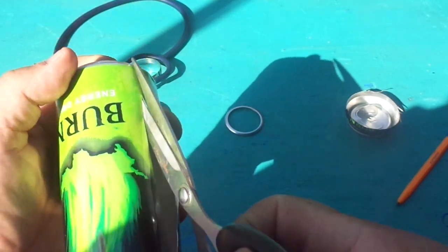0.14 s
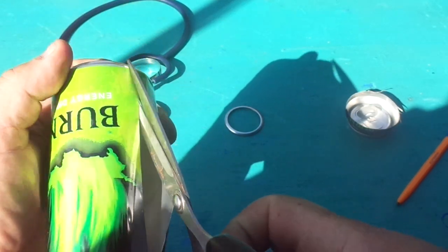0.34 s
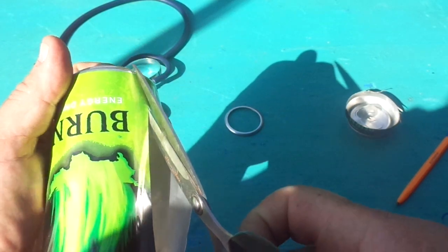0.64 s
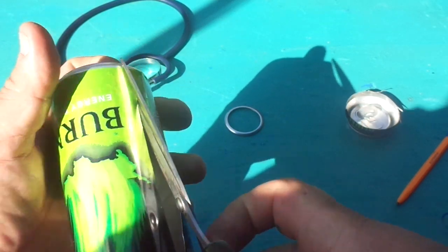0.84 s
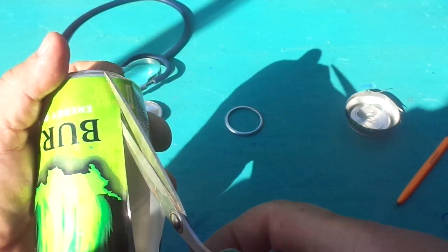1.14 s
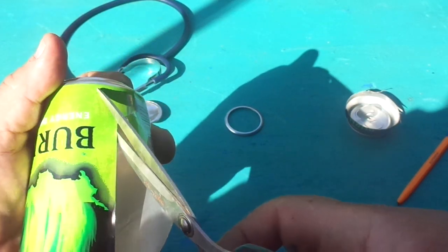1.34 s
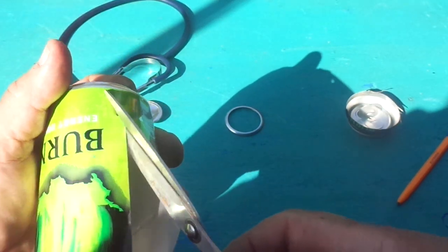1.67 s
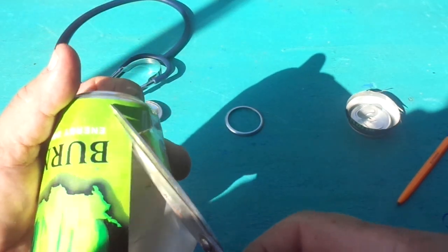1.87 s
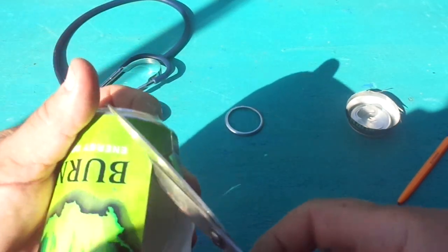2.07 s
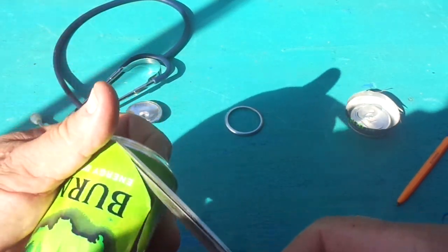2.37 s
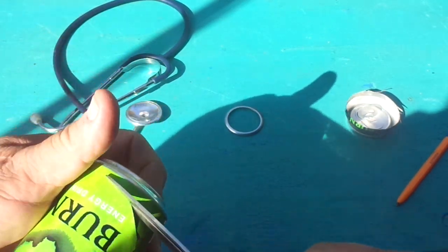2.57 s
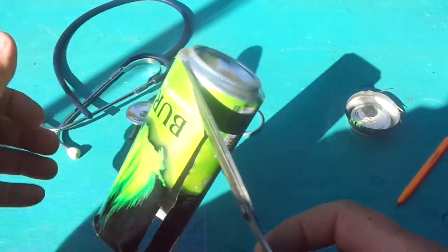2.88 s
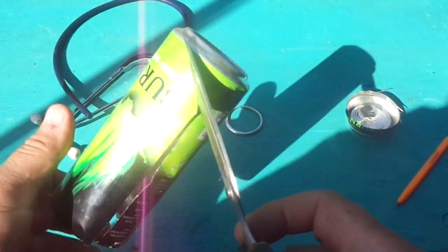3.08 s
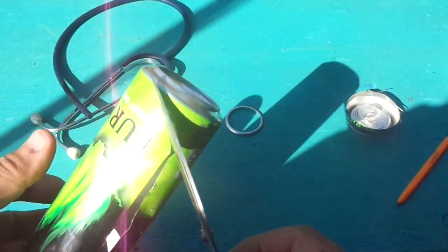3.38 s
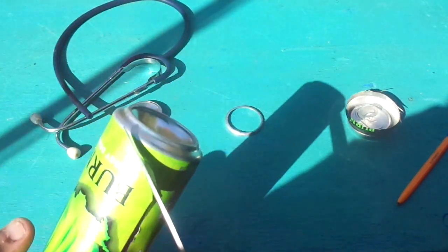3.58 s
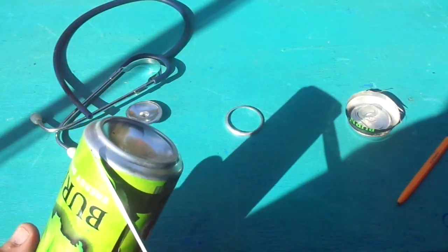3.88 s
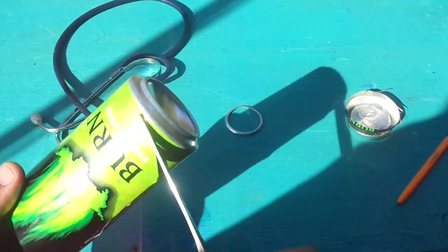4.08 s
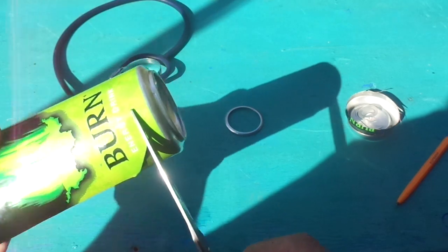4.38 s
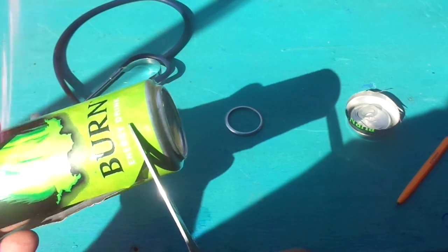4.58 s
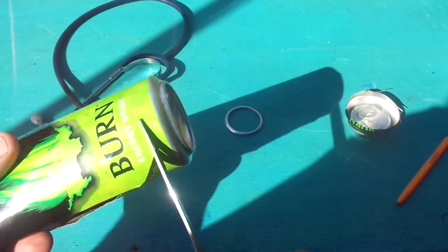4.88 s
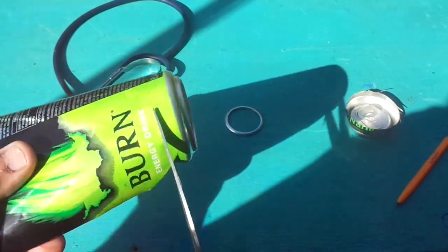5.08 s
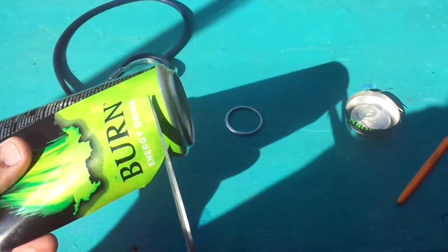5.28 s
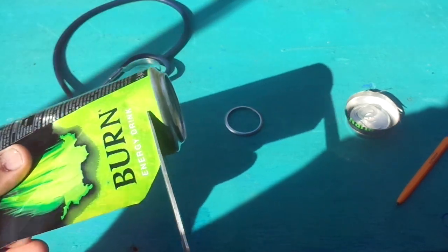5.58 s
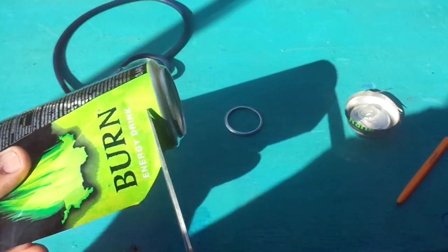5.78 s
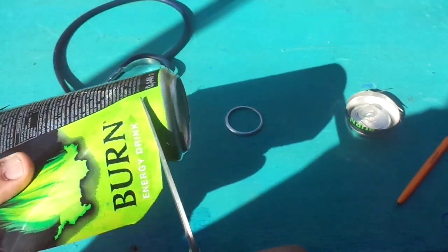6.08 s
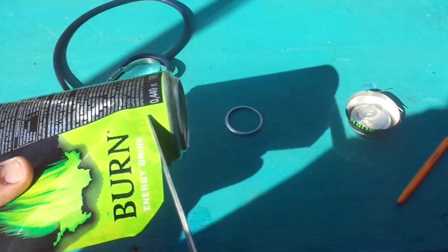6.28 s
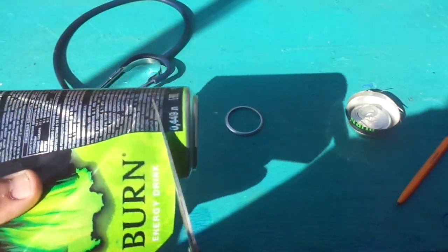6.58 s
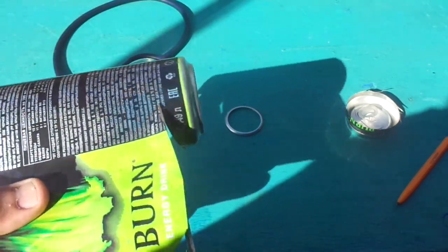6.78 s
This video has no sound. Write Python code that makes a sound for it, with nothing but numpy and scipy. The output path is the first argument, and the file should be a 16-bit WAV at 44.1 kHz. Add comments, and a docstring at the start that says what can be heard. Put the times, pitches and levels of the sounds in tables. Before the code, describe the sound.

Scissors cut through a thin aluminium drink can close up, with irregular crisp snaps, crackling shears and short hollow metallic rings in a small room.

```python
"""Scissors cut the wall of an aluminium drink can, close to the microphone in a small room.
The blades shear the sheet in runs of tiny fractures; sharp snaps are avalanches of them. Each jolt rings
the hollow can, higher late on as its top comes loose, and the cut sheet wobbles in low bending modes.
Behind: narrow bands of noise sound faintly late on, skin rubs, hands and can bump dully on the table, a low
thump lies under one hard snap, and the room adds reflections, air and hum. A limiter catches the peaks."""
import sys
import numpy as np
from scipy import signal
from scipy.fft import rfft, irfft
from scipy.io import wavfile
from scipy.ndimage import uniform_filter1d, minimum_filter1d

SR = 44100
rng = np.random.default_rng(int(sys.argv[2]) if len(sys.argv) > 2 else 0)


def wav_record(signal):
    """Record a signal, one row per channel, as 16-bit PCM in the file named by sys.argv[1]."""
    frames = np.transpose(np.atleast_2d(signal))
    bounded = np.clip(frames, -1, 1)
    # unit amplitude maps onto the largest positive 16-bit level
    quanta = np.round(bounded * 32767).astype(np.int16)
    wavfile.write(sys.argv[1], SR, quanta)


N = 305613

# Levels in the tables are relative, ahead of any trim in the functions, unless marked rms.
# quiet air of the room, spectrum: (f/Hz, level/dB)
AIR_SPECTRUM = [(25, 1), (110, 1), (250, -0.5), (500, 2), (850, 6.5), (1400, 2.5), (2200, 0.5), (4000, -8),
                (15000, -14)]
AIR_RMS_DB = -51
HUM_HZ, HUM_RMS_DB = 81, -69.5
# reverberation of the room: (f/Hz, t60/s)
ROOM_DECAY = [(200, 0.24), (800, 0.11), (2000, 0.12), (5500, 0.11), (14000, 0.12)]
# spectrum of the faint stereo side signal: (f/Hz, level/dB)
SIDE_SPECTRUM = [(300, -22), (800, -31), (3000, -23), (6000, -19), (14000, -12)]
BAND_LIMIT_HZ = 15300
# faint narrow-band noise near 1.5 and 2.1 kHz, course: (t/s, level/dB)
FAINT_LEVEL = [(5.9, -54), (6.05, -50), (6.25, -48), (6.42, -54)]
# bands of that noise: (f/Hz, width/Hz, level/dB)
FAINT_BANDS = [(1530, 40, 1.5), (2070, 170, -4)]
# fingers shifting on the can: (t/s, level/dB)
HANDLING_LEVEL = [(0, -53), (1.1, -68), (1.3, -56), (1.8, -74), (1.9, -52), (2.35, -51), (2.9, -54),
                  (3.07, -66), (3.35, -45.5), (3.8, -82), (3.95, -74), (4.3, -53), (4.8, -77), (5.3, -61),
                  (6.93, -62.5)]
# dull bumps of handling; the last row is the low thump under the hard snap at 5.87 s: (t/s, level/dB, f/Hz)
BUMP_EVENTS = [(1.151, -44, 101), (1.512, -36, 129), (1.67, -34, 130), (1.705, -41, 110), (1.763, -38, 100),
               (1.815, -35.5, 146), (2.021, -38, 75), (2.058, -42, 165), (2.166, -40, 80),
               (2.203, -36, 118), (2.334, -35.5, 141), (2.365, -34, 121), (2.382, -39, 151),
               (2.406, -33, 117), (3.161, -49, 96.7), (3.339, -52, 93.7), (3.626, -37, 100.6),
               (3.674, -37.5, 198), (3.702, -34.5, 220), (3.724, -23.5, 207), (3.763, -35, 111),
               (3.802, -40, 90), (3.874, -50, 115), (4.237, -41.5, 252), (5.869, -26.5, 56)]
# how freely the cut sheet can flap: (t/s, level/dB)
SHEET_LOOSENESS = [(0, -7), (1.2, -13), (4.3, -12), (5.1, -4.5), (5.8, 1.5), (6.93, -5.5)]
# slow bending modes of the cut sheet: (f/Hz, width/Hz, level/dB)
BENDING_MODES = [(262, 90, -9), (373, 208, 4), (469, 99, 3)]
# ring pitch of the can, moved by the grip and the loosening top, before detuning: (t/s, f/Hz)
RING_PITCH = [(0, 805), (1.05, 790), (1.24, 850), (1.34, 795), (1.75, 855), (2.05, 926), (2.6, 929),
              (2.8, 840), (3.12, 860), (3.2, 700), (3.28, 907), (4.3, 846.6), (5.45, 921), (5.65, 1100),
              (6.2, 1130), (6.9, 1295)]
# modes of the hollow can: (multiple of the ring pitch, level/dB, t60/s at 850 Hz ring pitch)
HOLLOW_MODES = [(.87, -5.5, 0.17), (1.0, 16, 0.033), (1.13, -9.5, 0.13), (1.42, 3.5, 0.016),
                (.95, -1.5, 0.059)]
# spectrum of a fracture in the sheet, before tilt and patches: (f/Hz, level/dB)
FRACTURE_SPECTRUM = [(30, -25.5), (150, -27), (350, -18), (550, -15), (800, -0.5), (1100, -5.5),
                     (1750, 2.5), (2300, -2), (3400, -0.5), (4800, -6), (7000, -5.5), (10000, -9.5),
                     (15000, -22)]
# modes of the thin wall and the blades, before detuning: (f/Hz, level over the crack/dB, t60/s)
WALL_MODES = [(1398, 1.5, 0.024), (2010, -4, 0.051), (2603, 1, 0.06), (2910, -0.5, 0.053), (3070, -6, 0.04),
              (3620, -1, 0.094), (4185, -1.5, 0.039), (5620, -3.5, 0.011), (6650, -2, 0.032)]
# strokes of the blades, shearing or scraping:
# (start t/s, end t/s, level/dB, swell from start to end/dB, brightness/dB per octave)
STROKES = [(0.074, 0.146, -31.5, 3, 1), (0.194, 0.219, -41, 7, -1.5), (0.766, 0.802, -48.5, -1, 3),
           (0.815, 0.832, -31, 3, -1), (0.972, 1.058, -40, -1, -3.5), (1.213, 1.286, -25, -10, -5),
           (1.337, 1.381, -33, 10, -4.5), (1.577, 1.609, -43, 15, -8), (1.758, 1.825, -29.5, -9, 0.5),
           (1.923, 2.016, -28.5, 17, 0), (2.156, 2.252, -33, 15.5, -11), (2.252, 2.308, -21.5, -7, 0),
           (2.49, 2.557, -40.5, -13, -1), (2.634, 2.74, -42, -15, -2.5), (2.728, 2.786, -31, -2, -1),
           (2.789, 2.906, -47, -6, -3), (3.238, 3.368, -41.5, 1, 4.5), (3.384, 3.512, -41.5, -11, -3),
           (3.5, 3.674, -47.5, 9, -8), (3.976, 4.018, -46.5, 10, 1.5), (4.069, 4.115, -34.5, 4, -2),
           (4.174, 4.257, -28.5, -13.5, 1.5), (4.386, 4.55, -42, -4, 2.5), (4.565, 4.755, -46, 3, 2.5),
           (4.99, 5.03, -33.5, 9, -5), (5.04, 5.143, -30.5, -15, -3.5), (5.283, 5.356, -38.5, 5.5, -5),
           (5.579, 5.676, -29.5, -15, 1), (5.75, 5.857, -44, 11, 1), (5.948, 6.163, -50, -7, -1),
           (6.175, 6.205, -28, -11, 1.5), (6.39, 6.475, -28.5, 5, -4.5), (6.555, 6.575, -30, 13, -3),
           (6.662, 6.708, -13, 9, 1), (6.708, 6.793, -35.5, -11, -1.5), (6.843, 6.932, -11, -1, 0.5)]
# ring of the can under the blades against the crackle: (t/s, level/dB)
STROKE_RING = [(0, 0), (1.4, 6), (3.4, 4.5), (4.3, 1.5), (5.1, -3), (6.9, -4)]
# fades of a stroke: (stroke level/dB, share of the stroke spent fading in and out)
STROKE_FADE = [(-39, 0.2), (-33, 0.2)]
# snaps of the sheet: (t/s, hollow ring level/dB, crack level/dB)
SNAP_EVENTS = [(0.044, -13, -8.5), (0.146, -17, -21.5), (0.226, -25.5, -54), (0.239, -34, -19.5),
               (0.277, -37, -27.5), (0.306, -32, -29), (0.355, -26, -37.5), (0.39, -26, -28.5),
               (0.508, -31, -32.5), (0.529, -36, -33), (0.634, -34.5, -28.5), (0.751, -28.5, -46.5),
               (0.809, -21.5, -30), (0.987, -26, -26.5), (1.002, -20, -29), (1.083, -44, -39),
               (1.195, -37.5, -36), (1.212, -33, -23.5), (1.225, -9.5, -15), (1.263, -14, -27.5),
               (1.272, -26, -36), (1.301, -22, -47), (1.354, -19.5, -46), (1.366, -20.5, -28),
               (1.414, -34, -36), (1.444, -29.5, -41), (1.456, -31, -34), (1.627, -21.5, -19.5),
               (1.652, -19, -19.5), (1.661, -22, -19.5), (1.669, -23, -20.5), (1.709, -14.5, -20),
               (1.762, -17, -19.5), (1.769, -14.5, -21), (1.784, -19.5, -37), (1.792, -13.5, -17),
               (1.936, -56, -22), (1.966, -27, -34), (1.988, -21, -25.5), (2.018, -10.5, -8.5),
               (2.127, -24, -37.5), (2.169, -27, -27.5), (2.205, -21, -25), (2.255, -14.5, -19),
               (2.282, -13.5, -6), (2.366, -30.5, -41.5), (2.426, -10, -6.5), (2.437, -13, -22),
               (2.488, -24.5, -40), (2.589, -17, -8.5), (2.612, -16, -24.5), (2.733, -25, -22.5),
               (2.816, -28, -59), (3.125, -41.5, -52), (3.189, -42, -44), (3.288, -21.5, -26.5),
               (3.404, -25, -31), (3.419, -31, -28.5), (3.615, -30.5, -35), (3.934, -36, -51),
               (3.974, -32.5, -48), (4.057, -33, -47), (4.072, -25.5, -45), (4.108, -27, -37.5),
               (4.263, -24.5, -24), (4.275, -19, -29.5), (4.523, -24.5, -34), (4.755, -36, -21),
               (4.932, -38, -38), (4.973, -15, -20), (5.038, -26, -16.5), (5.068, -29, -18.5),
               (5.233, -28, -47), (5.444, -35.5, -45), (5.478, -22.5, -26), (5.552, -33, -19),
               (5.573, -12, -6.5), (5.854, -33.5, -23.5), (5.87, -12, -2.5), (6.0, -39, -35.5),
               (6.111, -43, -41.5), (6.166, -20.5, -34), (6.182, -15, -14), (6.408, -49, -14.5),
               (6.483, -17.5, -8.5), (6.668, -25.5, -18), (6.691, -22, -1), (6.749, -20.5, -30),
               (6.818, -28.5, -32), (6.836, -21.5, -29), (6.85, -20, -10.5), (6.874, -24, 0.5)]
# a snap that tears more than it buckles is brighter: (crack minus ring level/dB, brightness/dB per octave)
SNAP_BRIGHTNESS = [(-34, -4.5), (8, -3), (10, 4.5)]


def amp(db):
    """Decibels to amplitude."""
    return 10 ** (np.asarray(db) / 20)


def rms(x):
    """Root mean square level."""
    return np.sqrt(np.mean(x ** 2) + 1e-20)


def seconds(size):
    """Time of each sample."""
    return np.arange(size) / SR


def follow(points, x):
    """Joins the points of a two-column table by straight lines."""
    return np.interp(x, *np.transpose(points))


def read(points, hz):
    """Joins a table of (f/Hz, value) on a log-frequency axis."""
    f, value = np.transpose(points)
    return np.interp(np.log(hz + 1), np.log(f), value)


def add(mix, s, sound):
    """Lays a sound into the mix at a time, cut off at the end."""
    part = mix[max(round(s * SR), 0):][:len(sound)]
    part += sound[:len(part)]


def colour(x, points):
    """Filters a full-length sound by a spectrum in dB."""
    gain = amp(read(points, np.fft.rfftfreq(N, 1 / SR)))
    return irfft(rfft(x) * gain, N)


def resonate(x, modes):
    """Sums narrow resonances of (f/Hz, width/Hz, level/dB) driven by a sound."""
    return sum(amp(db) * signal.lfilter(*signal.iirpeak(hz, hz / width, SR), x) for hz, width, db in modes)


def air():
    """Steady coloured noise of the room, with a faint sine hum."""
    noise = colour(rng.standard_normal(N), AIR_SPECTRUM)
    hum = np.sqrt(2) * np.sin(2 * np.pi * HUM_HZ * seconds(N))
    return amp(AIR_RMS_DB) * noise / rms(noise) + amp(HUM_RMS_DB) * hum


def room(x, delay_s=.005, size=16384):
    """Dense reflections from the table and near walls, each band dying at its own speed."""
    taps = rng.standard_normal(size) * (rng.random(size) < 4000 / SR)  # about 4000 a second
    hz, t, bands = signal.stft(taps, SR, nperseg=256)
    decay = amp(-60 * t / read(ROOM_DECAY, hz)[:, None])
    tail = signal.istft(bands * decay, SR, nperseg=256)[1]
    tail = np.concatenate([np.zeros(round(delay_s * SR)), tail / np.linalg.norm(tail)])
    return signal.fftconvolve(x, tail)[:N]


def faint_noise():
    """Noise narrowed by two resonances, near 1.5 and 2.1 kHz."""
    bands = resonate(rng.standard_normal(N), FAINT_BANDS)
    # silent outside the table's times
    level_db = np.interp(seconds(N), *np.transpose(FAINT_LEVEL), left=-np.inf, right=-np.inf)
    return amp(level_db) * bands / rms(bands)


def can_pitch(s):
    """The can's ring pitch at any moment, in Hz."""
    return follow(RING_PITCH, s)


def hollow_ring(hz, low_edge=1.0, size=4096):
    """The can's answer to one push; the open shell radiates little below its modes."""
    t = seconds(size)
    damping = (hz / 850) ** 1.6  # a higher ring dies sooner
    ring = sum(amp(db - 60 * damping * t / t60) * np.sin(2 * np.pi * hz * ratio * t)
               for ratio, db, t60 in HOLLOW_MODES)
    return signal.sosfilt(signal.butter(6, low_edge * hz, "high", fs=SR, output="sos"), ring)


def crack_click(bright_db, patchy_db=2, size=4096):
    """One fracture: a causal click, coloured by its place on the sheet, with the wall modes ringing after it."""
    hz, t = abs(np.fft.fftfreq(size, 1 / SR)), seconds(size)
    place = np.column_stack([np.geomspace(1200, 15000, 16), rng.standard_normal(16)])
    tilt_db = bright_db * np.log2(np.maximum(hz, 2500) / 2500)  # tilts only above 2500 Hz
    gain_db = read(FRACTURE_SPECTRUM, hz) + tilt_db + patchy_db * read(place, hz)
    # minimum phase: the energy comes at the start
    click = np.fft.ifft(np.exp(np.conj(signal.hilbert(np.log(amp(gain_db)))))).real
    bends = 1 + 0.026 * rng.standard_normal(len(WALL_MODES))  # bending the sheet detunes its modes
    wall = 0
    for (f, db, t60), bend in zip(WALL_MODES, bends):
        unit_peak = 2 * np.log(1000) / (t60 * SR)  # about unit gain at resonance before the mode's level
        wall = wall + amp(db - 60 * t / t60) * np.cos(2 * np.pi * f * bend * t) * unit_peak
    return click + signal.fftconvolve(click, wall)[:size]


def handling(rustle_db=-4, hollow_db=-22, rub_db=-1, flutter_db=4):
    """Skin slides unevenly over the can: a faint rustle, a low rub, and light nudges that ring the can."""
    t = seconds(N)
    touch = amp(follow(HANDLING_LEVEL, t))
    grip = colour(rng.standard_normal(N), [(8, -10.0), (40, -3.0), (120, -41)])  # slow unevenness
    slide = amp(flutter_db * grip / rms(grip)) * rng.standard_normal(N)
    rustle = signal.fftconvolve(slide, crack_click(-1.0))[:N]
    rub = colour(slide, [(25, -21), (70, 6.5), (130, -6.0), (350, 2.0), (700, -8), (2000, -54)])
    strength = amp(7 * np.minimum(rng.exponential(1, N), 2.5)) * rng.choice([-1, 1], N)
    nudges = strength * (rng.random(N) < 45 / SR)  # about 45 a second
    swings = signal.sosfilt(signal.butter(2, 95, fs=SR, output="sos"), nudges)
    # each nudge is a few cycles at the can's pitch
    hollow = swings * np.sin(2 * np.pi * np.cumsum(can_pitch(t)) / SR)
    skin = amp(rustle_db) * rustle / rms(rustle) + amp(rub_db) * rub / rms(rub)
    return touch * skin + np.sqrt(touch) * amp(hollow_db) * hollow / rms(hollow)


def bumps(t60=0.022, thud_db=-1, upper_db=-7, size=4096):
    """Soft bumps and the low thump: a heavily damped low tone with one upper partial."""
    out, t = np.zeros(N), seconds(size)
    for s, db, hz in BUMP_EVENTS:
        turn = 2 * np.pi * hz * t
        tone = np.sin(turn) + amp(upper_db) * np.sin(1.63 * turn)
        thud = tone * amp(-60 * t / t60) * (1 - np.exp(-t / 0.006))
        add(out, s - .002, amp(db + thud_db) * thud / rms(thud[:round(.01 * SR)]))
    return out


def flex(cutting):
    """The cuts set the loose sheet wobbling in its low bending modes."""
    return 2 * resonate(cutting, BENDING_MODES) * amp(follow(SHEET_LOOSENESS, seconds(N)))


def burst(rise_s, decay_s, size=1500):
    """A short swell of random motion."""
    t = seconds(size)
    return rng.standard_normal(size) * (1 - np.exp(-t / rise_s)) * np.exp(-t / decay_s)


def fractures(size, scrape):
    """Sparse slips of uneven strength, about 170 a second, over a fine scrape."""
    strength = amp(3.5 * np.minimum(rng.exponential(1, size), 3)) * rng.choice([-1, 1], size)
    return strength * (rng.random(size) < 170 / SR) + scrape * rng.standard_normal(size)


def catching(size, lumps_db, lump_s):
    """The blades catch and let go, so the cutting comes in lumps."""
    knots = np.arange(0, 1, abs(lump_s))
    return amp(lumps_db * np.interp(seconds(size), knots, rng.uniform(-1.16, 1, len(knots))))


def shears(ring_db=-2, crackle_db=-1, wander=0.033, smear_s=0.00096, lumps_db=3, lump_s=.009, count=4):
    """The blades advance by tiny fractures at several spots; each has its own colour and shakes the can."""
    out, scrape = np.zeros(N), .06
    for start, end, db, swell_db, bright_db in STROKES:
        n = round(abs(end - start) * SR)
        hz = can_pitch((start + end) / 2)
        hollow_db = db + follow(STROKE_RING, start)
        force = amp(swell_db * np.linspace(-.5, .5, n))
        fade = signal.windows.tukey(n, follow(STROKE_FADE, db))
        contact = fade * catching(n, lumps_db, lump_s)
        ring = crackle = 0
        for _ in range(count):
            spot = fractures(n, scrape) * force * contact
            # bending waves smear each click
            grain = signal.fftconvolve(burst(smear_s / 10, smear_s), crack_click(bright_db, patchy_db=3.5))
            crackle = crackle + signal.fftconvolve(spot, grain)
            spot_hz = hz * (1 + wander * rng.standard_normal())
            ring = ring + signal.fftconvolve(spot, hollow_ring(spot_hz))
        add(out, start, rms(force) * amp(hollow_db + ring_db) * ring / rms(ring[:n]))
        add(out, start, rms(force) * amp(db + crackle_db) * crackle / rms(crackle[:n]))
    return out


def snaps(rise_s=0.00068, slip_s=0.0066, ring_db=-1, crack_db=-1, wander=0.032, vary_db=.6):
    """A snap is an avalanche of fractures, over in milliseconds; its jolt rings the can."""
    out, tear_s = np.zeros(N), .0033
    attack = round(.008 * SR)  # levels are set over the first 8 ms
    variations = rng.standard_normal((len(SNAP_EVENTS), 2))
    for (s, hollow_db, sharp_db), (detune, place) in zip(SNAP_EVENTS, variations):
        build_s = np.interp(sharp_db, [-38, -24], [slip_s, rise_s])  # weak snaps give way gradually
        bright_db = follow(SNAP_BRIGHTNESS, sharp_db - hollow_db) + vary_db * place
        crack = signal.fftconvolve(burst(build_s, tear_s), crack_click(bright_db))
        ring = hollow_ring(can_pitch(s) * (1 + wander * detune))
        ring = ring * (1 - np.exp(-seconds(len(ring)) / (.5 * build_s)))
        add(out, s, amp(sharp_db + crack_db) * crack / rms(crack[:attack]))
        add(out, s, amp(hollow_db + ring_db) * ring / rms(ring[:attack]))
    return out


def scene(room_db=-10, apart_db=-7):
    """Direct sound in the middle, with a faint, mostly treble side signal."""
    cutting = snaps() + shears()
    near = cutting + flex(cutting) + faint_noise() + bumps() + handling()
    mid = near + amp(room_db) * room(near) + air()
    side = amp(apart_db) * colour(room(near, delay_s=0) + air(), SIDE_SPECTRUM)
    return np.array([mid + side, mid - side])


def record(dry, ceiling=1.0, size=24):
    """A fast limiter, linked across both channels, holds peaks at full scale; then comes the band limit."""
    gain = np.minimum(1, ceiling / (abs(dry).max(0) + 1e-9))
    limited = dry * uniform_filter1d(minimum_filter1d(gain, size), size)
    low_pass = signal.firwin(511, BAND_LIMIT_HZ, window=("kaiser", 8), fs=SR)
    return signal.oaconvolve(limited, low_pass[None], "same")


dry = scene()
out = record(dry)
wav_record(out)
```